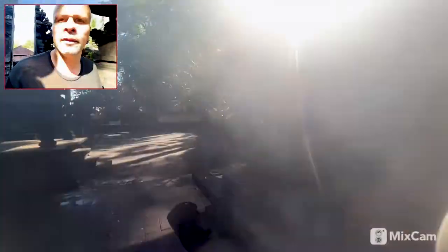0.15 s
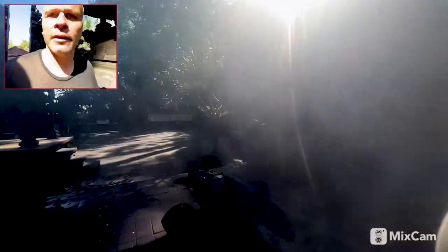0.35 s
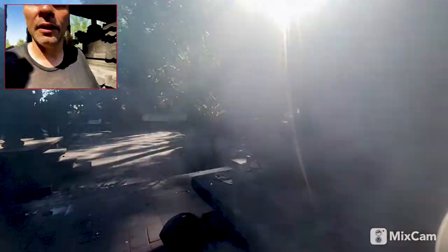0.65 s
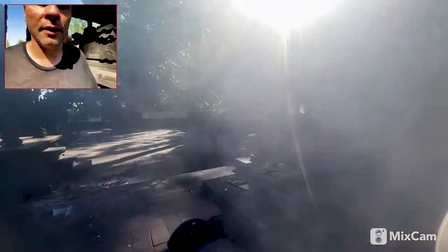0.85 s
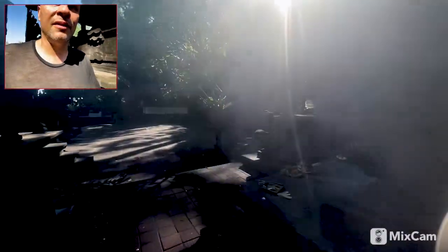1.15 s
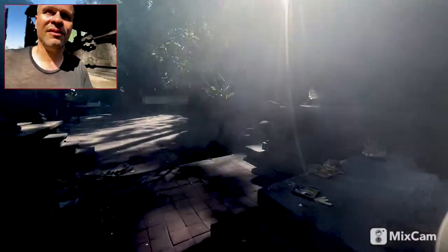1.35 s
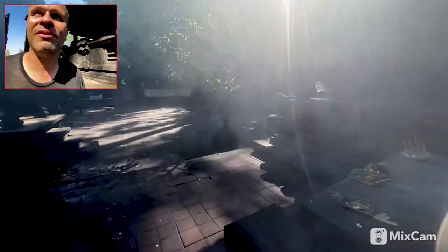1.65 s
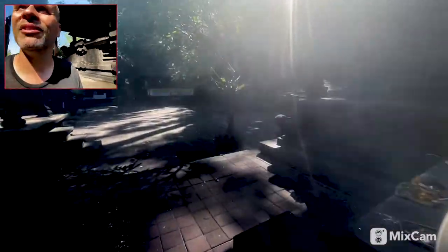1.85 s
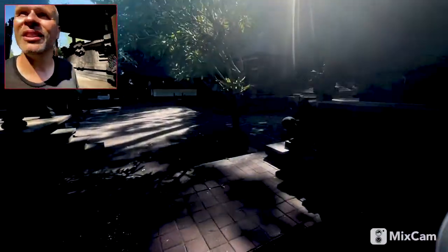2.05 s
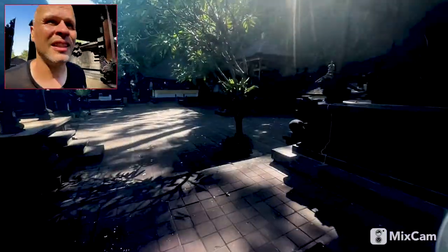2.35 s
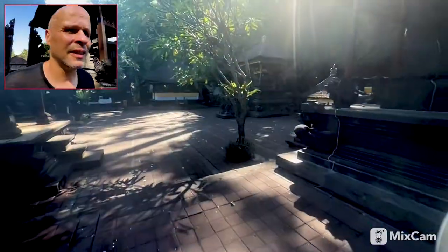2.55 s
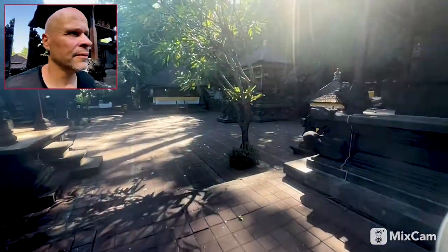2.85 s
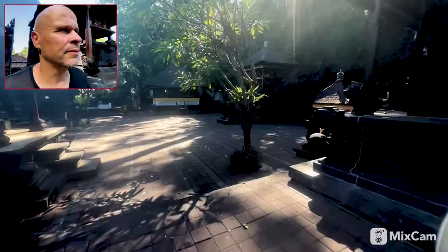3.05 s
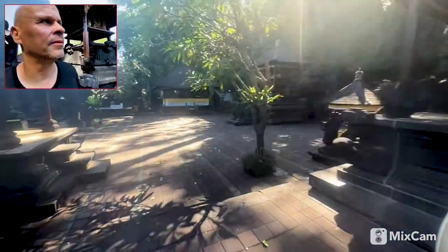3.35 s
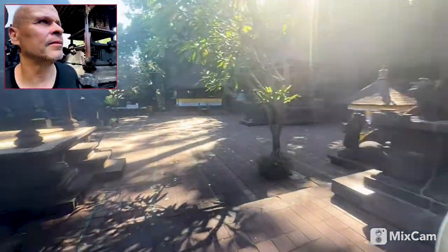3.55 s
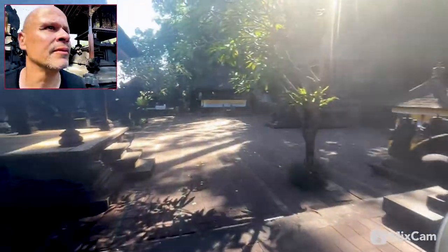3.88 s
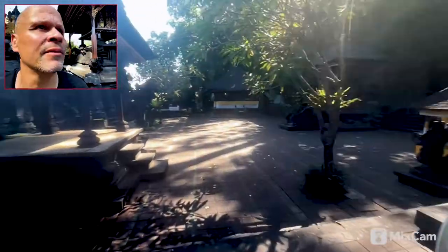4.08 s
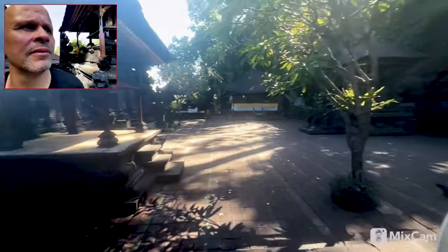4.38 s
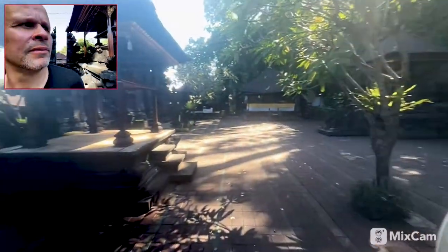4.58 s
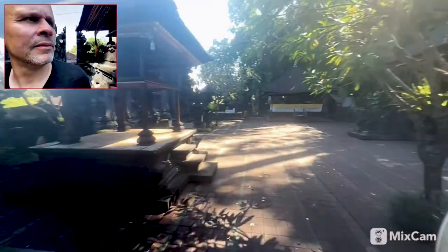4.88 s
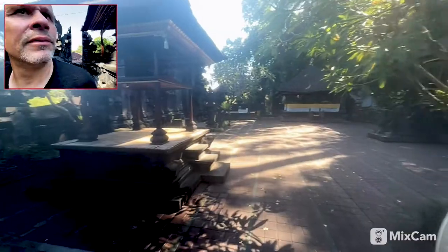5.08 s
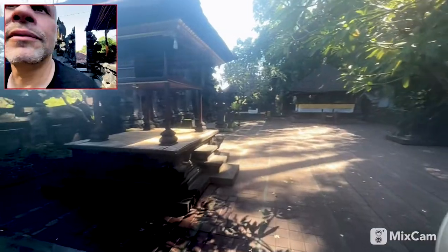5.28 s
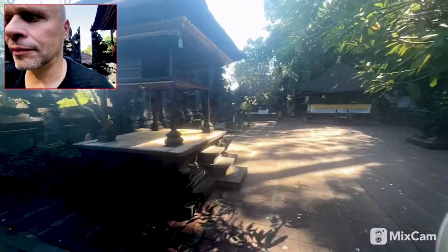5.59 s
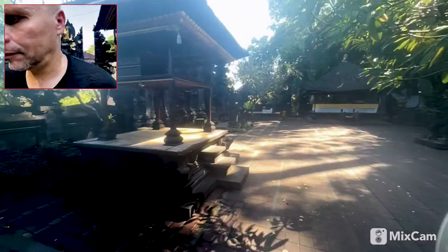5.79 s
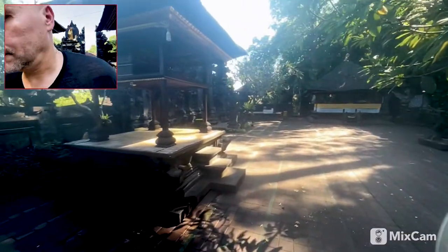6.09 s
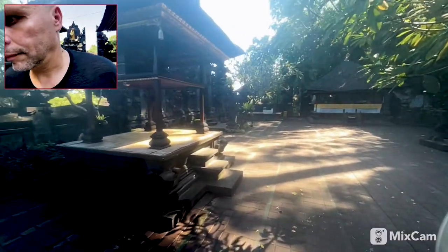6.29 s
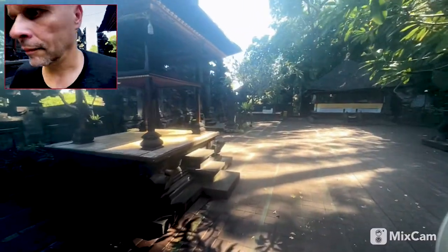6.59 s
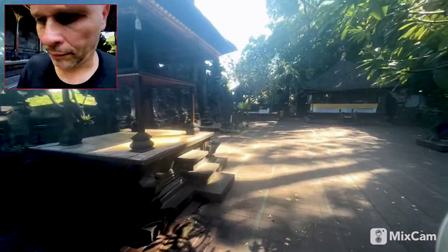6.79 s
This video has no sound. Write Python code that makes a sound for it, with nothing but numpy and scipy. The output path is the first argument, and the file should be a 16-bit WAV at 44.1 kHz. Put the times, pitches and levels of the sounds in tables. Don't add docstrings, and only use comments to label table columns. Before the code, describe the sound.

A bat colony's very high, hissing chirr swells and flickers over a low fluctuating engine drone, with a few bird chirps and sharper shrieks near the end.

```python
import sys
import numpy as np
from scipy import signal
from scipy.fft import rfft, irfft, next_fast_len
from scipy.io import wavfile
from scipy.ndimage import uniform_filter1d, map_coordinates

SR = 44100
rng = np.random.default_rng(int(sys.argv[2]) if len(sys.argv) > 2 else 0)


def volts(x):
    e = np.asarray(x, float) / 20
    return 10 ** e


def file_out(sig):
    cols = np.atleast_2d(sig).T
    lim = np.clip(cols, -1, 1)
    pcm = np.round(lim * 32767).astype(np.int16)
    wavfile.write(sys.argv[1], SR, pcm)


N = 305613
TIME = np.arange(N) / SR


def unit(x):
    return x / np.sqrt(np.mean(x ** 2) + 1e-20)


def curves(rows):
    s, *cols = np.transpose(rows)
    return [np.interp(TIME, s, c) for c in cols]


def wobble(rate_hz):
    t = TIME[::16]
    knots = rng.standard_normal(int(N * 400 / SR))
    return np.interp(TIME, t, map_coordinates(knots, [t * rate_hz]))


def swells(rows):
    s, life_s, db = np.transpose(rows)[:, :, None]
    t = TIME[::32]
    bumps = np.cos(np.pi * np.clip((t - s) / life_s, -.5, .5)) ** 2
    return np.interp(TIME, t, np.sum(db * bumps, axis=0))


def coloured(x, spectrum):
    m = next_fast_len(N + 8192)
    hz, db = np.transpose(spectrum)
    log_hz = np.log(np.fft.rfftfreq(m, 1 / SR) + 1)
    gain = volts(np.interp(log_hz, np.log(hz + 1), db))
    return unit(irfft(rfft(x, m) * gain, m)[:N])


def squeaks(rows):
    s, life_s, hz0, hz1, db, blur_hz = np.transpose(rows)[:, :, None]
    k = np.arange(int(SR * life_s.max()) + 1)
    u = np.minimum(k / SR / life_s, 1)
    noise = rng.standard_normal(u.shape)
    tremble = unit(uniform_filter1d(uniform_filter1d(noise, size=30), size=30))
    hz = hz0 + (hz1 - hz0) * u + .9 * blur_hz * tremble
    phase = 2 * np.pi * np.cumsum(hz, axis=1) / SR
    rasp = unit(uniform_filter1d(uniform_filter1d(tremble[::-1], size=40), size=40))
    wave = volts(db + 2.2 + 3 * rasp) * np.sin(np.pi * u) ** .5 * np.sin(phase)
    at = (np.round(s * SR) + k).astype(int)
    return np.bincount(at.ravel(), wave.ravel(), N + SR)[:N]


def echoes(x, t60_s, wet_db):
    t = np.arange(SR // 3) / SR
    tail = volts(-60 * t / t60_s) * rng.standard_normal(len(t))
    return x + volts(wet_db) * signal.fftconvolve(x, tail / np.linalg.norm(tail))[:N]


# t/s, rumble level/dB, wash level/dB
TRAFFIC = [
    (0.0, -51.5, -53.5),
    (0.39, -51.5, -54),
    (0.75, -47, -51.5),
    (1.72, -47.5, -49.5),
    (3.09, -46.5, -49.5),
    (4.36, -47.5, -49),
    (6.93, -44.5, -50),
]
# f/Hz, level/dB per Hz
RUMBLE = [(13, -61.5), (22, -23), (44, -3), (64, 0), (103, -8), (141, -7.5), (200, -11), (237, -11.5),
          (347, -13), (500, -31.5), (650, -51.5), (1100, -120)]
# f/Hz, level/dB per Hz
WASH = [(240, -17.5), (400, -2.5), (648, -5.5), (807, -6), (1340, -8), (1660, -10.5), (2520, -11),
        (3360, -16.5), (5500, -19), (7150, -23.5), (12100, -120)]


def traffic():
    rumble_db, wash_db = curves(TRAFFIC)
    rumble = coloured(rng.standard_normal(N), RUMBLE)
    wash = coloured(rng.standard_normal(N), WASH)
    rumble *= volts(rumble_db + 2.5 + 1.37 * wobble(4.993))
    wash *= volts(wash_db + .6 + .45 * wobble(4))
    return rumble + wash


# t/s, f/Hz, level/dB
DRONE = [(0.0, 71.56, -56.5), (0.45, 76.95, -54.5), (0.7, 79.03, -41.5), (1.05, 78.91, -34.5),
         (1.33, 79.7, -37), (1.5, 80.1, -41), (2.07, 80, -38), (2.4, 78, -42.5), (2.8, 82.8, -37),
         (3.3, 83.35, -38.5), (4.42, 83.5, -38), (5.05, 83, -42), (5.2, 67.6, -38), (5.7, 65.3, -46),
         (5.86, 72.34, -43), (6.1, 65.5, -46), (6.45, 74, -48), (6.85, 59.7, -42)]
# middle t/s, length/s, change/dB
FADES = [(.23, .08, -14), (.93, 0.158, -7.5), (1.43, 0.15, -6.5), (1.87, 0.296, -6.5), (2.22, .14, -12.5),
         (2.56, 0.15, -9), (2.7, 0.091, -16), (2.86, 0.182, -17.5), (3.34, 0.097, -16), (3.78, 0.113, -8),
         (4.16, 0.098, -4.5), (4.5, 0.0804, -3.5), (4.83, .08, 0.5), (5.04, 0.047, -11.5),
         (5.21, .06, -11.5), (5.29, 0.043, -20.5), (5.46, 0.0582, -18.5), (5.54, .1, -10),
         (5.79, 0.0887, -5.5), (5.89, 0.071, -9.5), (6.0, .08, -6), (6.31, .12, -10), (6.52, .08, -22),
         (6.66, 0.15, -13.5), (6.93, 0.1035, -14.5)]
# t/s, level/dB
UNEVEN = [
    (0, -67.5),
    (2.2, -65.5),
    (2.5, -51),
    (3.15, -51.5),
    (3.35, -65.5),
    (3.55, -52.5),
    (4.1, -55),
    (4.8, -50.5),
    (5.05, -59),
    (5.2, -75),
]
UNEVEN_ORDER = 3 / 2
# t/s, f/Hz, level/dB
WHINE = [(0.0, 280, -80), (.9, 280.8, -66), (1.25, 277.8, -48.5), (1.5, 285.7, -54), (2.0, 291.6, -55.5),
         (2.3, 287.8, -49), (2.7, 286.6, -58.5), (3.15, 283.3, -58.5), (3.43, 288.9, -44.5),
         (3.9, 287, -61.5), (4.4, 290, -50), (4.7, 295, -65), (5.15, 307.6, -50), (5.9, 284.7, -59),
         (6.46, 293.3, -54), (6.93, 290, -50.5)]


def engine():
    hz, db = curves(DRONE)
    whine_hz, whine_db = curves(WHINE)
    uneven_db, = curves(UNEVEN)
    phase = 2 * np.pi * np.cumsum(hz + 0.5 * wobble(14)) / SR
    firing = volts(db + swells(FADES) + 2.5 + 0.68 * wobble(13.0)) * np.sin(phase)
    uneven = volts(uneven_db - 1.0 + 2.24 * wobble(6)) * np.sin(UNEVEN_ORDER * phase)
    whine_phase = 2 * np.pi * np.cumsum(whine_hz + 2.501 * wobble(10)) / SR
    whine = volts(whine_db - 2.5 + 2.62 * wobble(5.1)) * np.sin(whine_phase)
    return firing + uneven + whine


# f/Hz, level/dB re ring
BAR_MODES = [
    (2775, -2.5),
    (3085, -3.5),
    (3144, -1),
    (3768, -9),
]
# t/s, level/dB
RING = [
    (0, -59),
    (.19, -58),
    (.24, -65),
    (.42, -71),
]


def bar():
    ring_db, = curves(RING + [(.55, -100)])
    ring = np.zeros(N)
    for hz, db in BAR_MODES:
        phase = 2 * np.pi * hz * TIME + .9 * wobble(60)
        ring += volts(ring_db + db + 2.2 * wobble(40)) * np.sin(phase)
    return ring


# t/s, length/s, start f/Hz, end f/Hz, level/dB
CHIRPS = [(0.589, .026, 4200, 3525, -54.5), (.608, 0.0233, 3251, 3040, -54.5),
          (.636, 0.025, 2990, 4250, -57.5), (.655, 0.034, 4120, 3754, -52.5),
          (0.662, .018, 3505, 3220, -59.5), (1.206, .05, 4930, 4500, -52),
          (1.408, 0.0514, 5370, 2044, -52.5), (1.458, 0.0184, 2000, 3620, -50),
          (1.602, 0.0238, 7400, 5690, -44.5), (1.617, 0.019, 6000, 3760, -44),
          (1.634, 0.021, 6700, 5140, -47.5), (1.976, .026, 5262, 5220, -57),
          (2.582, 0.057, 4115, 4500, -56.5), (3.427, 0.037, 4267, 3755, -42.5),
          (3.452, 0.0304, 3347, 2850, -49), (3.486, 0.0253, 3700, 4250, -43),
          (3.506, 0.0238, 3567, 2815, -51.5), (3.457, 0.0202, 6500, 6010, -51.5),
          (4.78, .06, 4060, 3760, -55.5), (6.165, .026, 4770, 4840, -57), (6.77, 0.034, 2630, 2540, -54.5)]
CHIRP_BLUR_HZ = 179.6
TRILL_NOTES, TRILL_S, TRILL_GAP_S, TRILL_NOTE_S = 5, 1.436, .013, .013
TRILL_HZ, TRILL_END_HZ, TRILL_DB, TRILL_SWELL_DB = 5090, 4250, -52, 2


def birds():
    trill = []
    for k in range(TRILL_NOTES):
        db = TRILL_DB + TRILL_SWELL_DB * np.sin(np.pi * (k + .5) / TRILL_NOTES)
        trill.append((TRILL_S + k * TRILL_GAP_S, TRILL_NOTE_S, TRILL_HZ, TRILL_END_HZ, db))
    return squeaks([(*row, CHIRP_BLUR_HZ) for row in CHIRPS + trill])


# t/s, length/s, f/Hz, level/dB
SQUEALS = [(1.205, .045, 7144, -56.5), (1.26, .046, 5900, -55), (3.195, .1, 7200, -45),
           (3.205, 0.033, 8400, -48.5), (3.27, 0.044, 7560, -48), (3.28, .052, 6450, -56),
           (3.405, .025, 6030, -51.5), (4.52, .05, 7050, -50.5), (4.68, 0.0745, 6530, -51.5),
           (5.16, .072, 6154, -45.5), (5.29, 0.034, 7270, -42.5), (5.65, 0.0327, 6310, -46.5),
           (5.76, .045, 6900, -43), (5.76, 0.056, 8150, -55), (5.81, .051, 9300, -44.5),
           (5.83, 0.0494, 5810, -51), (6.14, 0.019, 6200, -49), (6.32, .069, 7370, -42.5),
           (6.47, 0.0516, 8300, -40.5), (6.55, 0.028, 7260, -48), (6.6, .076, 7374, -44),
           (6.85, 0.048, 8470, -44), (6.86, .04, 9060, -43.5)]
# t/s, length/s, f/Hz, level/dB
SHRIEKS = [(4.51, .043, 13400, -37.5), (4.67, .059, 12260, -39), (4.72, 0.0435, 13820, -32.5),
           (4.83, .031, 13210, -34), (4.95, .032, 11050, -39), (5.06, 0.0502, 13570, -42.5),
           (5.63, .05, 11780, -37.5), (5.82, .05, 12380, -35), (5.9, .03, 13780, -42),
           (5.96, 0.0359, 13720, -35.5), (6.06, 0.042, 12980, -27), (6.135, 0.041, 12110, -28.5),
           (6.18, 0.037, 11930, -28.5), (6.188, .018, 14200, -33.5), (6.21, 0.031, 13420, -28.5),
           (6.31, 0.0477, 11900, -29), (6.35, .04, 13300, -32.5), (6.355, 0.028, 11260, -33),
           (6.49, .04, 12080, -39.5), (6.54, .034, 12000, -33)]
# t/s, length/s, centre f/Hz, level/dB
HISSES = [(.155, 0.035, 7000, -53.5), (.33, 0.022, 7550, -56.5), (.555, 0.028, 7900, -51.5),
          (.605, 0.066, 3800, -56), (1.185, .09, 6220, -55.5), (1.445, 0.062, 4164, -52.5),
          (1.61, 0.06, 5790, -51.5), (3.2, .11, 7450, -50.5), (3.44, 0.1003, 5800, -52.5),
          (5.76, 0.1118, 6990, -48), (6.31, 0.069, 7500, -44.5), (3.5, 0.047, 3300, -54)]
SQUEAL_SAG, SHRIEK_SAG = .6, 0.248
SQUEAL_BLUR, SHRIEK_BLUR, HISS_BLUR = 0.0281, 0.03144, 0.161


def near_bats():
    kinds = [(SQUEALS, SQUEAL_SAG, SQUEAL_BLUR), (SHRIEKS, SHRIEK_SAG, SHRIEK_BLUR), (HISSES, 0, HISS_BLUR)]
    rows = []
    for calls, sag, blur in kinds:
        for s, life_s, hz, db in calls:
            rows.append((s, life_s, hz, hz * (1 - sag * life_s), db, blur * hz))
    return squeaks(rows)


def crowd(count, lo_hz, hi_hz, spread_db, near):
    when, pitch, glide, life, size = rng.random((count, 5)).T
    hz = lo_hz + (hi_hz - lo_hz) * pitch
    end_hz = hz * (1 + 0.1224 * (glide - .6))
    life_s = 0.01215 + 0.0491 * life
    db = -spread_db * np.log(size)
    rows = np.transpose([when * N / SR, life_s, hz, end_hz, db, 0.02964 * hz])
    voices = echoes(squeaks(rows), t60_s=.12, wet_db=2)
    voices /= np.sqrt(np.abs(uniform_filter1d(voices ** 2, size=2200)) + 1e-9)
    near = np.clip(near, 0, 1)
    return near * voices + np.sqrt(1 - near ** 2) * rng.standard_normal(N)


# t/s, colony level/dB, low voices level/dB re colony
COLONY = [(0.0, -39, -18.5), (0.6, -39, -11.5), (0.75, -36.5, -14), (1.25, -33, -12), (1.47, -37, -11),
          (1.7, -35, -12.5), (2.22, -37, -14), (2.35, -36, -12.5), (3.09, -36.5, -13.5), (3.61, -35, -13),
          (3.78, -32.5, -10.5), (3.96, -32.5, -15.5), (4.8, -32.5, -13.5), (5.15, -33, -12),
          (5.58, -31.5, -13), (5.8, -27.5, -14), (6.1, -31.5, -12.5), (6.93, -29, -16)]
# t/s, share
NEAR = [
    (0, 0.217),
    (4.3, 0.148),
    (5.6, 0.258),
    (6.93, 0.177),
]
# middle t/s, length/s, rise/dB
FLURRIES = [(1.22, 0.12, 0), (1.62, 0.097, 1), (2.365, .015, 3), (2.44, 0.014, 2.5), (3.055, 0.0546, -3.5),
            (3.25, .2, 2), (3.47, .26, 5), (4.045, 0.0135, 6), (4.55, 0.144, 3), (4.68, 0.0606, 2),
            (4.75, 0.106, 2.5), (5.22, .14, 1.5), (5.35, 0.206, 4), (5.65, .06, 1), (5.77, .08, 1.5),
            (5.84, .1, 0.5), (5.915, 0.054, 3.5), (5.97, 0.086, 5), (6.08, 0.0665, 5.5), (6.18, 0.24, 5),
            (6.36, 0.2505, 4.5), (6.52, .18, 4), (6.66, .08, 3.5), (6.88, 0.1164, 2.5)]
THROAT_FOLLOWS = .35
# f/Hz, level/dB per Hz
SHRILL = [(5000, -30), (8000, -15), (8800, -13), (10500, -5), (12400, 2), (14000, 1), (15100, -3),
          (15700, -5.5), (17000, -15)]
# f/Hz, level/dB per Hz
THROATY = [(2060, -67.5), (3500, -16), (5590, -7), (6940, -2), (8740, -5), (9500, -0.5), (12400, -13.5),
           (20900, -120)]


def colony():
    level_db, low_db = curves(COLONY)
    near, = curves(NEAR)
    flurry_db = swells(FLURRIES)
    flicker_db = 0.404 * wobble(25) + .5 * wobble(90)
    shrill = crowd(count=700, lo_hz=7971, hi_hz=16176, spread_db=-2.5, near=1.315 * near)
    throaty = crowd(count=450, lo_hz=4500, hi_hz=9492, spread_db=0.5, near=1.214 * near)
    shrill = volts(flurry_db - .5) * coloured(shrill, SHRILL)
    throaty = volts(THROAT_FOLLOWS * flurry_db + low_db - 2.0) * coloured(throaty, THROATY)
    return volts(level_db + flicker_db) * (shrill + throaty)


def scene():
    bird_calls = echoes(birds(), t60_s=.1, wet_db=-6.5)
    bat_calls = echoes(near_bats(), t60_s=.1, wet_db=-4.5)
    mix = traffic() + engine() + bar() + bird_calls + bat_calls + colony()
    return np.tile(mix, (2, 1))


def top_cut(x):
    return signal.sosfilt(signal.butter(12, 16230, fs=SR, output="sos"), x)


TOP_HZ = 15730


def record(dry):
    passed = np.fft.rfftfreq(N, 1 / SR) < TOP_HZ
    mix = irfft(rfft(dry) * passed, N)
    return top_cut(mix)


dry = scene()
out = record(dry)
file_out(out)
```